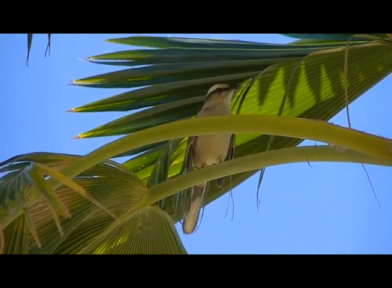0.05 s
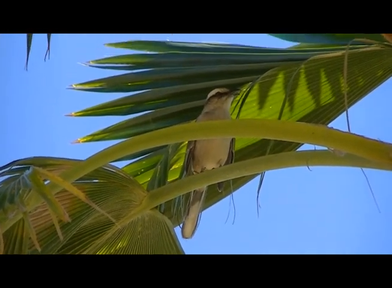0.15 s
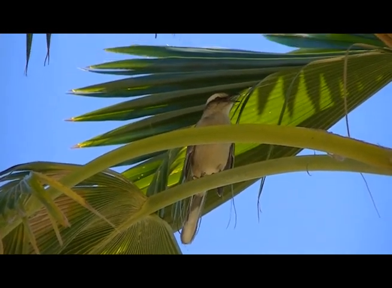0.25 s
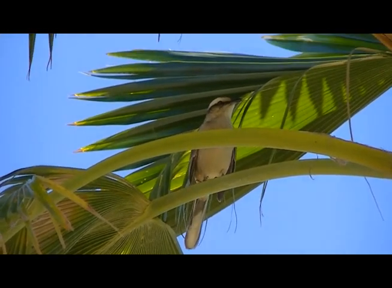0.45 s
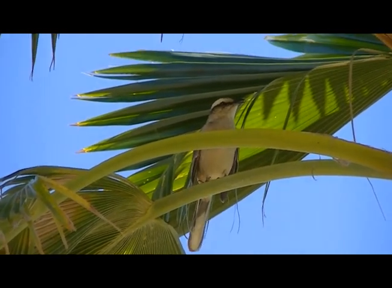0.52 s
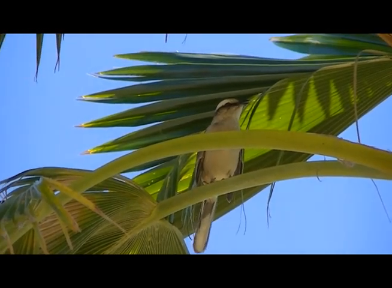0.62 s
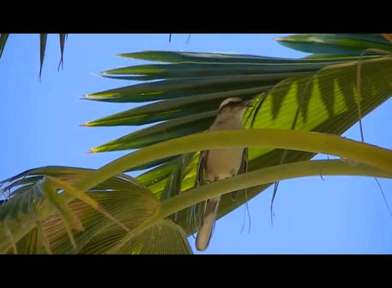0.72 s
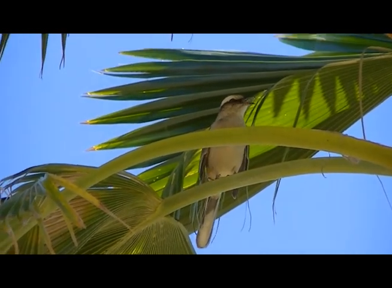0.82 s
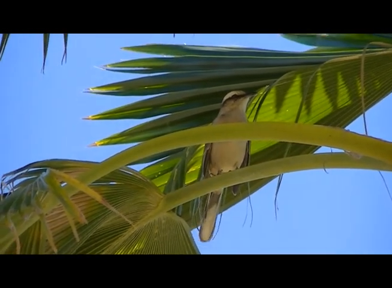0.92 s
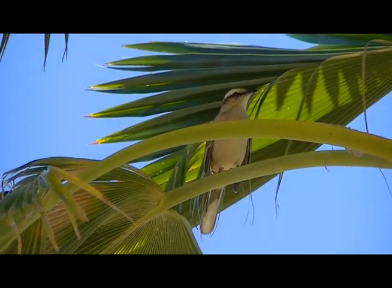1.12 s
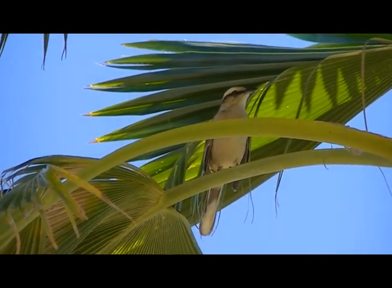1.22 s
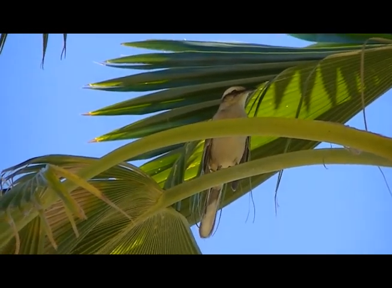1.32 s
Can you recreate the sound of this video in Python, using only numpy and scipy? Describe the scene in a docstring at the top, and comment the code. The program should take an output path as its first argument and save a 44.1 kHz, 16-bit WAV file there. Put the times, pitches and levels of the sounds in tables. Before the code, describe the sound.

A bird calls twice outdoors, directly in front of the microphone, each call a drawn-out, raspy rising whistle. The second starts with a quick chirp and ends louder. A soft rush and low rumble continue underneath.

```python
"""Outdoors by a palm: a steady rush and a low rumble, with a perched bird straight ahead of the microphone.
It gives a harsh rising call, a whistle that flutters over a hundred times a second, roughened by a
lower voice and a pulsing rasp. A second call opens with a short clear chirp and climbs as the rumble
swells. Nearby fronds and the surroundings answer each call faintly; two faint dry ticks come last."""
import sys
import numpy as np
from scipy import signal
from scipy.fft import rfft, irfft, next_fast_len
from scipy.io import wavfile
from scipy.ndimage import uniform_filter1d, map_coordinates

SR = 44100
rng = np.random.default_rng(int(sys.argv[2]) if len(sys.argv) > 2 else 0)


def wav_out(sig):
    """Save sig, one row per channel (or a flat mono array), as 16-bit PCM at SR to the path in sys.argv[1]."""
    wavfile.write(sys.argv[1], SR, np.round(np.clip(np.atleast_2d(sig).T, -1, 1) * 32767).astype(np.int16))


N = 59535
REFERENCE_DB = -25  # voice level at moderate effort
HARSH_HZ = 2330  # pitch above which the loud rasp and the lower voice set in


def amp(db):
    """Decibels to gain."""
    return 10 ** (np.asarray(db) / 20)


def unit(x):
    """Scale to rms 1."""
    return x / np.sqrt(np.mean(x ** 2) + 1e-20)


def along(points, hz):
    """Read (frequency [Hz], value) points on a log frequency axis."""
    knots_hz, values = np.transpose(points)
    return np.interp(np.log(hz + 1), np.log(knots_hz + 1), values)


def curves(rows):
    """One value per sample for each column after the time."""
    times, *columns = np.transpose(rows)
    return [np.interp(np.arange(N) / SR, times, column) for column in columns]


def wobble(knots_per_s):
    """A smooth random curve."""
    return map_coordinates(rng.standard_normal(4096), [np.arange(N) * knots_per_s / SR], mode="mirror")


def filtered(x, response):
    """Apply a response given as a function of frequency."""
    size = next_fast_len(N + SR // 2)
    return irfft(rfft(x, size) * response(np.fft.rfftfreq(size, 1 / SR)), size)[..., :N]


def noise(spectrum):
    """Coloured noise of rms 1."""
    return unit(filtered(rng.standard_normal(N), lambda hz: amp(along(spectrum, hz))))


def above(pitch, edge_hz, width_hz=90):
    """Rises from 0 to 1 as the pitch passes an edge."""
    return .5 + .5 * np.tanh((pitch - edge_hz) / width_hz)


def background(rumble_hz=93, half_width_hz=17):
    """The bed of the place: a steady outdoor rush and a narrow rumble that swells in the second call."""
    # Colour of the rush, and its stereo width: (frequency [Hz], relative level [dB])
    air_colour = [(15, -65), (25, -29.5), (53, -13.5), (97, -11), (175, -8.5), (240, -6.5), (313, -13),
                  (378, -7), (420, -8.5), (885, -13.5), (1320, -18.5), (1550, -16), (2020, -21),
                  (2570, -19), (2930, -25), (6180, -31.5), (14500, -50.5)]
    air_side = [(30, -9), (500, -19.5), (1200, -21.5), (6000, -61.5)]
    # Course of the rush and of the rumble: (time [s], level [dB])
    air_level = [(0, -40.5), (.55, -43.5), (.95, -40.5), (1.35, -41.5)]
    rumble_level = [(0, -51), (.82, -50.5), (.85, -38), (.91, -45), (.99, -52.5), (1.12, -46), (1.35, -49)]
    air_gain = amp(curves(air_level)[0])
    rumble = filtered(rng.standard_normal(N), lambda hz: 1 / (1 + ((hz - rumble_hz) / half_width_hz) ** 4))
    mid = air_gain * noise(air_colour) + amp(curves(rumble_level)[0]) * unit(rumble)
    side = air_gain * filtered(noise(air_colour), lambda hz: amp(along(air_side, hz)))
    return np.array([mid + side, mid - side])


def ticks(width_s=.004):
    """Faint dry ticks in the centre, perhaps from the leaves."""
    # Peak of each tick: (time [s], level [dB])
    peaks = [(1.251, -55.5), (1.315, -47.5)]
    # Their bright colour: (frequency [Hz], relative level [dB])
    colour = [(1500, -24), (4000, -13), (7000, 0.5), (10000, -17), (14000, -17)]
    t = np.arange(N) / SR
    return noise(colour) * sum(amp(db) * np.exp(-((t - at) / width_s) ** 2) for at, db in peaks)


def surroundings(x, level_db=-19.5, side_db=-18):
    """The place returns a faint diffuse tail, almost centred."""
    # Decay of the tail: (frequency [Hz], time to fall 60 dB [s])
    t60 = [(500, 0.26), (2500, 0.74), (10000, 0.44)]
    hz, t, spectra = signal.stft(rng.standard_normal((2, SR)), SR, nperseg=256)
    decay = amp(-60 * t / along(t60, hz)[:, None])
    tail = signal.istft(spectra * decay, SR, nperseg=256)[1]
    mid, side = signal.fftconvolve(x[None], tail / np.linalg.norm(tail[0]), axes=1)[:, :N]
    side = amp(side_db) * side
    return amp(level_db) * np.array([mid + side, mid - side])


def fronds(x, side_db=-27):
    """Stiff leaves close to the perch give a few quick reflections, a little right of centre."""
    # Reflections off the leaves: (delay [s], gain [ratio])
    paths = [(.0023, 0.07), (.0041, 0.46), (.0068, 0.09)]
    echo = filtered(x, lambda hz: sum(gain * np.exp(-2j * np.pi * hz * delay) for delay, gain in paths))
    return echo * (1 + amp(side_db) * np.array([[-1], [1]]))


def rasp(pitch, effort_db):
    """Air noise in the throat: it grows with effort and changes colour near the top of the climb."""
    # Soft rasp low in the call, thin hiss midway, loud rasp on top: (frequency [Hz], relative level [dB])
    soft_colour = [(900, -33), (1200, -21.5), (1450, 4), (1900, 1.5), (2300, 5), (2800, 1.5), (3200, -8.5),
                   (3800, -35.5), (5500, -48.5), (7000, -40), (9000, -46.5)]
    sizzle_colour = [(2500, -20), (3200, 14), (3900, 2), (4500, 4.5), (5700, 1.5), (7000, -20),
                     (9000, -29.5), (10200, -8), (11800, -23.5), (13600, -4), (14600, -5)]
    loud_colour = [(1500, -35), (2100, -1), (2700, 12), (3200, 2), (3700, -43.5), (4500, -17), (5400, -4.5),
                   (6100, -28.5), (7100, -12), (8500, -19.5), (9300, -44), (10400, -27), (11800, -52),
                   (13500, -33.5), (14600, -41)]
    soft = amp(-36 + .083 * effort_db) * noise(soft_colour)
    sizzle = amp(-45.5 + .89 * effort_db) * noise(sizzle_colour)
    loud = amp(-38 + .84 * effort_db) * noise(loud_colour)
    harsh = above(pitch, HARSH_HZ)
    return (1 - above(pitch, edge_hz=2230)) * soft + (1 - harsh) * sizzle + harsh * loud


def harmonics(phase, levels_db):
    """Overtones of a voice from the second harmonic up, coloured by the throat."""
    # Response of the throat: (frequency [Hz], gain [dB])
    throat = [(3000, 11), (3700, 8.5), (4500, -1), (5400, -1), (6100, 1), (7000, 0), (8000, -11),
              (9500, -4.5), (11000, 12)]
    stack = sum(amp(db) * np.sin(order * phase) for order, db in enumerate(levels_db, 2))
    return filtered(stack, lambda hz: amp(along(throat, hz)))


def lower_voice(pitch, level_db, swing, pulse):
    """A buzz just under the whistle that beats against it, probably the other side of the syrinx."""
    # Harmonics 2 to 4 ahead of the throat: (relative level [dB])
    overtones_db = [-18, -22.5, -41.5]
    pitch_ratio = .9 + .041 * swing + .013 * wobble(450)
    phase = 2 * np.pi * np.cumsum(pitch * pitch_ratio) / SR
    fundamental = amp(level_db - 7) * np.sqrt(pulse) * np.sin(phase)
    overtone_gain = amp(REFERENCE_DB + .27 * (level_db - REFERENCE_DB))
    overtone_pulse = unit(amp(-5.5 * swing))  # strongest at the bottom of each pitch swing
    return fundamental + overtone_gain * overtone_pulse * harmonics(phase, overtones_db)


def whistle(pitch, depth, swing, swing_share=.11, jitter_share=.02):
    """The main voice: a tone whose pitch swings with each flutter, with overtones in the clear chirp."""
    # Harmonics 2 to 4 of the chirp ahead of the throat: (relative level [dB])
    chirp_db = [-16.5, -20, -36]
    bend = swing_share * (swing - .5) + jitter_share * wobble(700)
    phase = 2 * np.pi * np.cumsum(pitch * (1 + depth * bend)) / SR
    clear = np.clip(1 - 3 * depth, 0, 1)
    return np.sin(phase) + clear * harmonics(phase, chirp_db)


def call(rows, pulse_db=9.5, pulse_jitter_db=2.17, rasp_pulse_db=3.5, rate_jitter=.0525):
    """One call: a single flutter drives the whistle, the rasp and, high in the climb, the lower voice."""
    pitch, level_db, rate, depth = curves(rows)
    t = np.arange(N) / SR
    sounding = uniform_filter1d(1. * ((t >= rows[0][0]) & (t <= rows[-1][0])), size=300)
    flutter = 2 * np.pi * np.cumsum(rate * (1 + rate_jitter * wobble(70.49))) / SR
    swing = np.cos(flutter + .87)  # the pitch swings ahead of the loudness
    pulse = amp(depth * pulse_db * np.cos(flutter))
    pulse /= np.sqrt(uniform_filter1d(pulse ** 2, size=1100))  # same power at any flutter depth
    tone = whistle(pitch, depth, swing)
    pulse *= amp(pulse_jitter_db * depth * wobble(200))
    voice = np.sqrt(2) * amp(level_db - 1.5) * pulse * tone
    buzz = above(pitch, HARSH_HZ) * lower_voice(pitch, level_db, swing, pulse)
    hiss = rasp(pitch, level_db - REFERENCE_DB) * unit(amp(rasp_pulse_db * np.cos(flutter)))
    return sounding * (voice + depth * (hiss + buzz))


def bird():
    """Two harsh rising calls from the palm; the second opens with a chirp before the flutter sets in."""
    # Course of each call: (time [s], pitch [Hz], level [dB], flutter rate [Hz], flutter depth [0-1])
    first_call = [(0, 1810.0, -41, 100, 0.8), (0.08, 1550.0, -37, 100, 0.8), (0.16, 1740.0, -33, 100, 1),
                  (0.225, 2030.0, -26, 108, 0.8), (0.259, 2260.0, -23, 115, 0.8),
                  (0.273, 2250.0, -17, 117, 1), (0.29, 2400.0, -18, 115, 0.8), (0.318, 2600.0, -15, 108, 1),
                  (0.355, 2630.0, -17, 112, 1), (0.39, 2370.0, -21, 128, 0.7),
                  (0.42, 2600.0, -19, 120, 0.7), (0.436, 2360.0, -28, 120, 0.6),
                  (0.45, 2250, -60, 120, 0.6)]
    second_call = [(0.607, 1250, -55, 140, 0), (0.621, 1720.0, -33, 140, 0), (0.634, 1830.0, -29, 140, 0),
                   (0.6435, 2580.0, -19, 140, 0.45), (0.652, 2260.0, -17, 140, 0.7),
                   (0.664, 2040.0, -23, 140, 0.9), (0.68, 1720.0, -32, 120, 0.9),
                   (0.701, 1840.0, -35, 110, 0.9), (0.712, 2000.0, -27, 110, 0.9),
                   (0.738, 2170.0, -23, 115, 0.8), (0.767, 2150.0, -23, 125, 0.8),
                   (0.8, 2340.0, -15, 140, 0.8), (0.83, 2680.0, -12, 140, 0.9),
                   (0.858, 2690.0, -14, 140, 0.9), (0.872, 2650.0, -17, 145, 0.7),
                   (0.891, 2660.0, -18, 148, 0.7), (0.901, 2640.0, -13, 153, 0.9),
                   (0.926, 2790.0, -14, 155, 0.7), (0.948, 2710.0, -24, 155, 0.4),
                   (0.968, 2650, -46, 155, 0.4)]
    return call(first_call) + call(second_call)


def scene():
    """The bird straight ahead of the microphone, with the place around it in stereo."""
    direct = bird()
    return direct + fronds(direct) + surroundings(direct) + background() + ticks()


def record(dry, top_hz=14650):
    """The camera keeps nothing above its band limit."""
    return filtered(dry, lambda hz: hz < top_hz)


dry = scene()
out = record(dry)
wav_out(out)
```